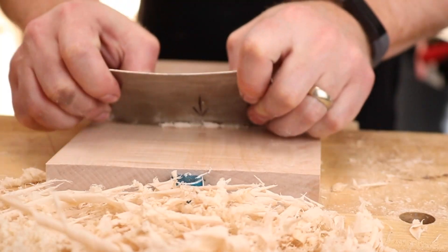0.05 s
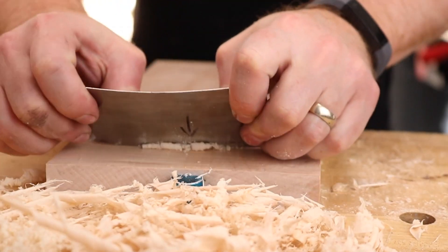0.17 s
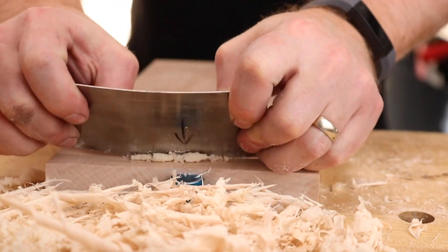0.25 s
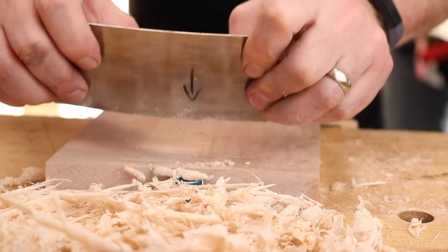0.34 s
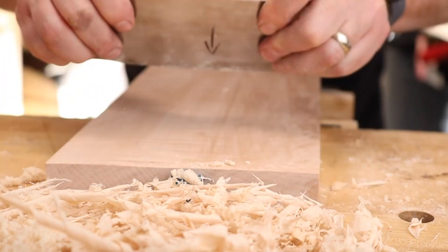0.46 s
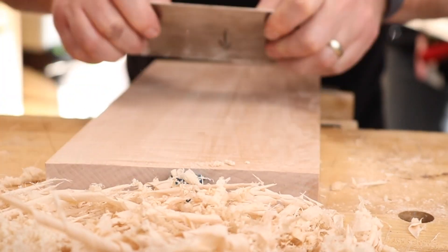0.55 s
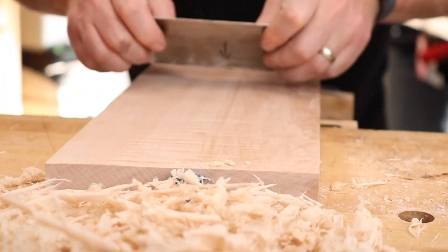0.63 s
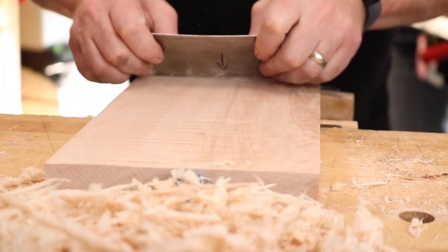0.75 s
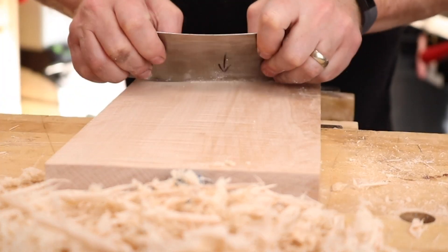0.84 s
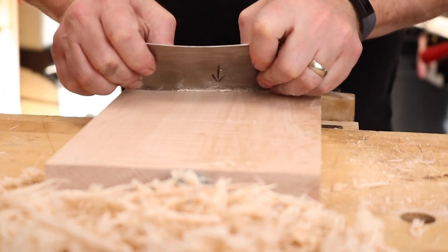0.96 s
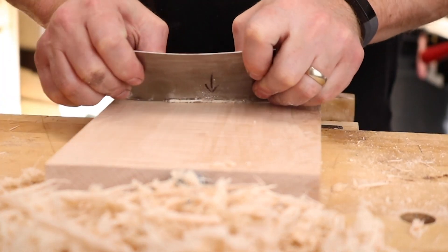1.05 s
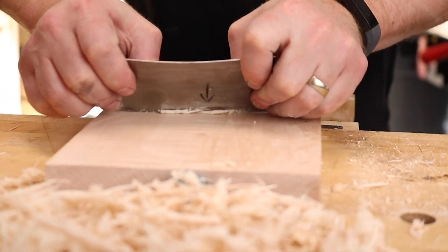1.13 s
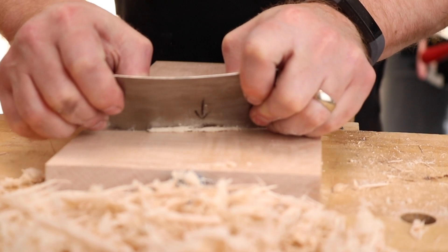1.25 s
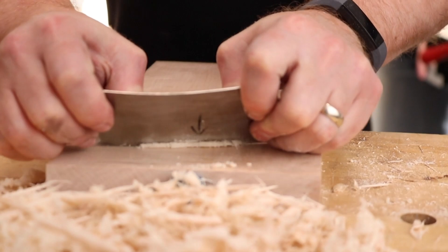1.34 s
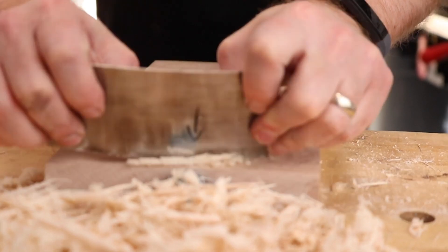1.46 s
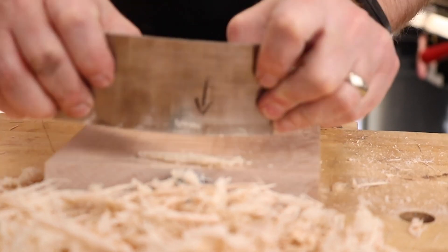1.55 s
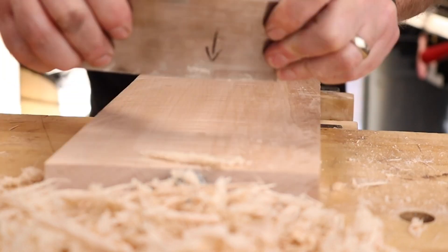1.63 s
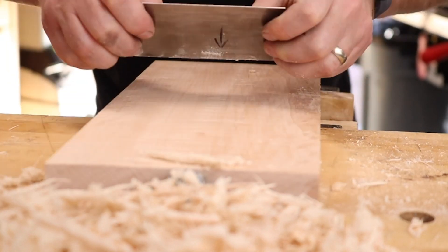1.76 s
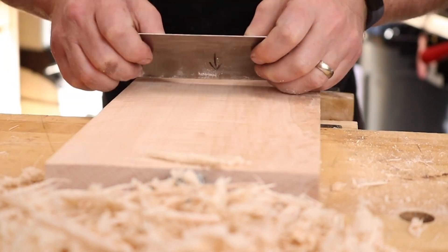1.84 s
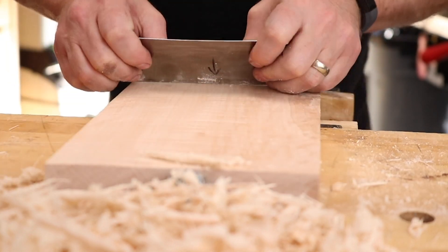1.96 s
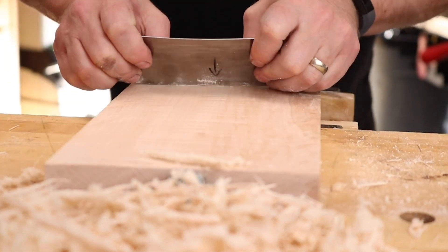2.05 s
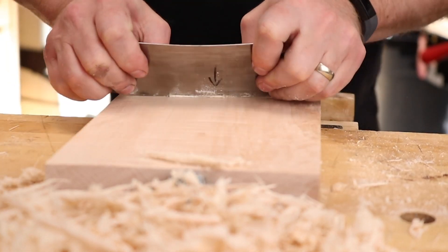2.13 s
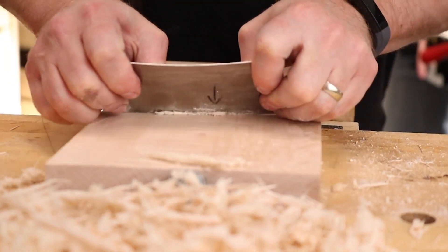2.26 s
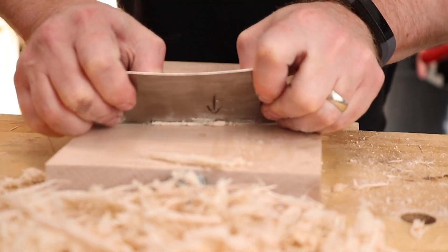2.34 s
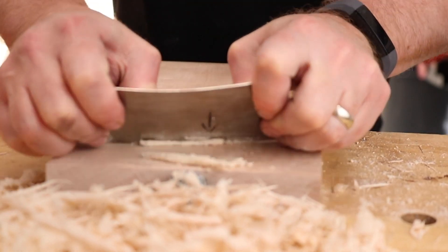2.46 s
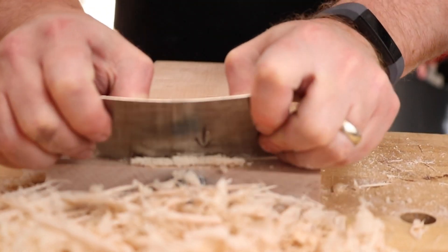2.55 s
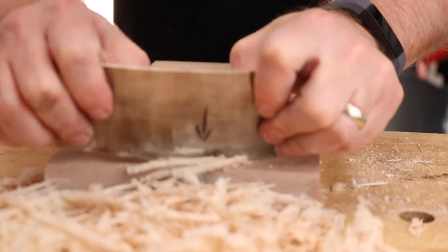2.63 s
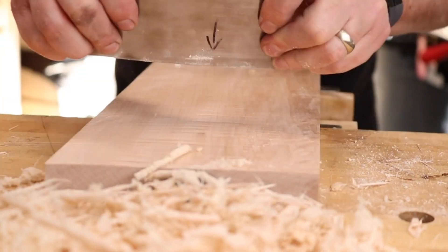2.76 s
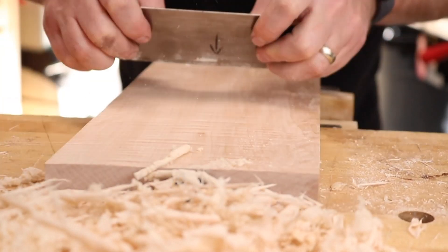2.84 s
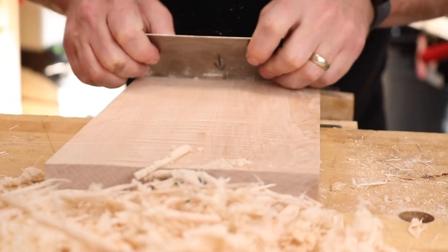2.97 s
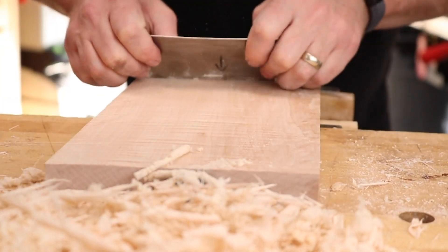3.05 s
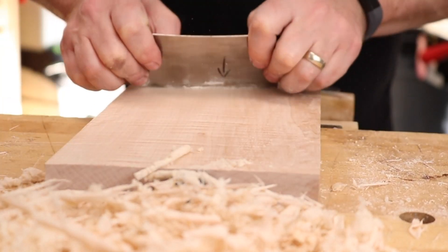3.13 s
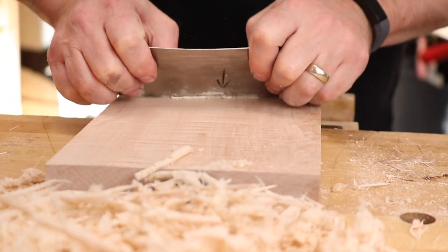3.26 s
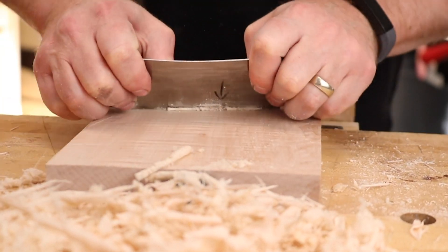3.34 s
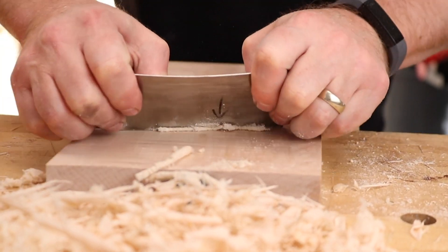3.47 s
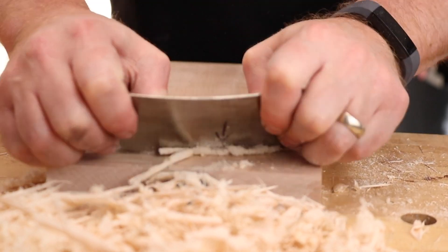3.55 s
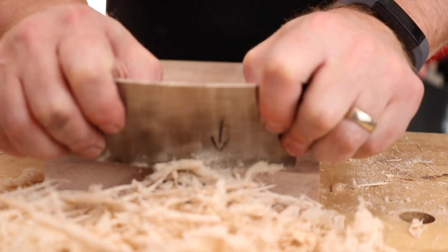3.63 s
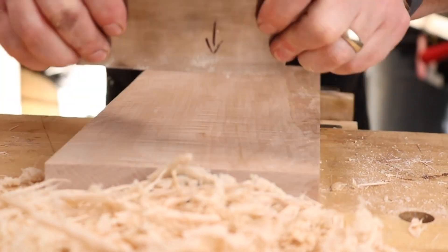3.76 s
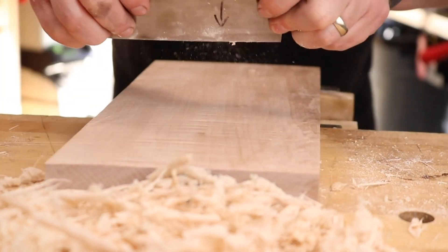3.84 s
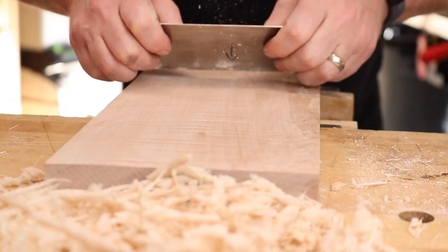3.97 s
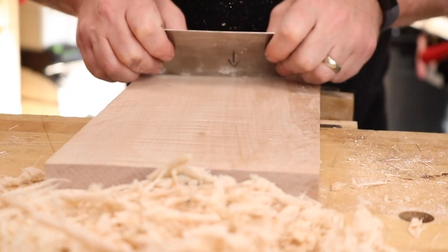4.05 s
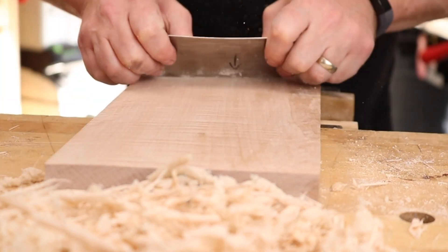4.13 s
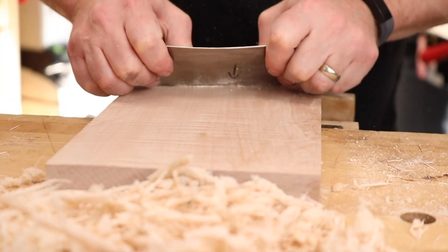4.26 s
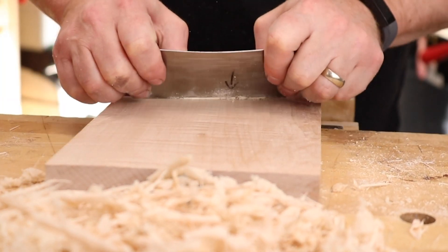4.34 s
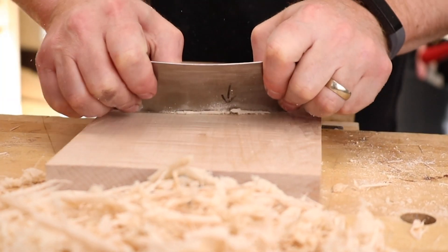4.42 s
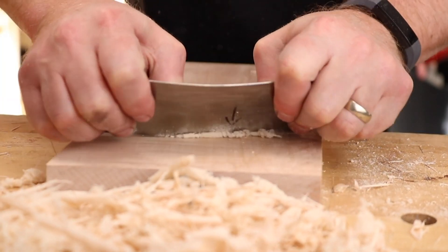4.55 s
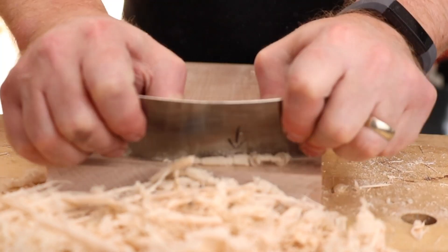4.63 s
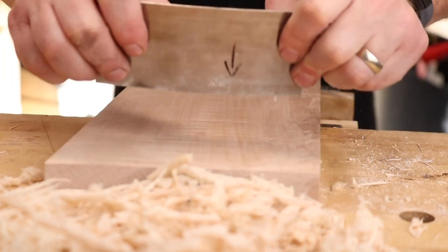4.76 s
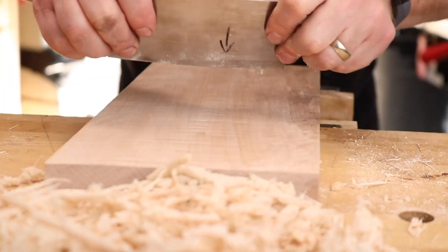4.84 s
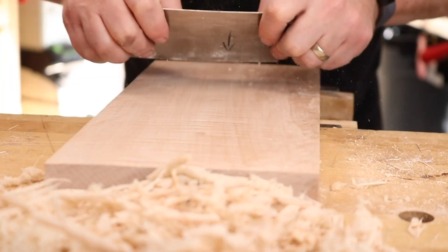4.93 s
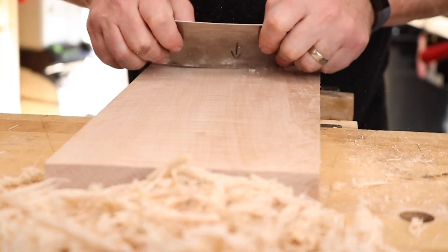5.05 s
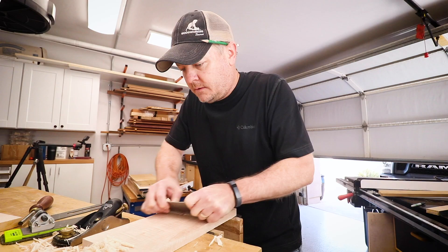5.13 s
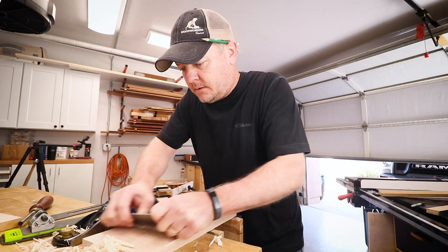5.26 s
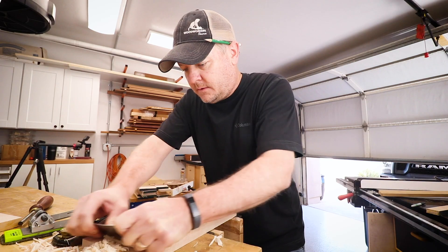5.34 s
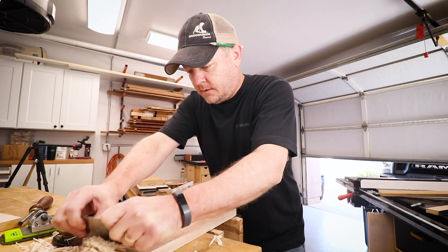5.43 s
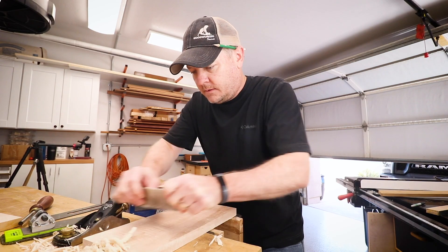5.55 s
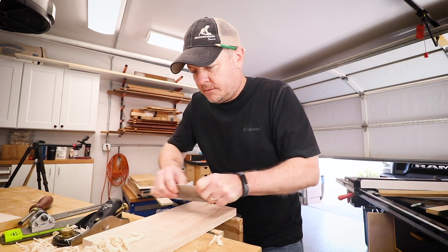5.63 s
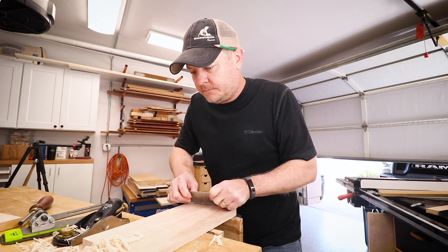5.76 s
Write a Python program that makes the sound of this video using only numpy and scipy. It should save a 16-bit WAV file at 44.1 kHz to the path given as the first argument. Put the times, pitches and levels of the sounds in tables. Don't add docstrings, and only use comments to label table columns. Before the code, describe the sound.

A hard woody clack and a light tick open, followed by a gritty half-second scrape. Five more strokes come at roughly one-second intervals, each started by a board-and-blade tap. The hiss is dense and bright with metallic rasp; bench knocks come after the early strokes. The room replies briefly, over faint hum, creaks and rumble. Close mono microphone.

```python
import sys
import numpy as np
from scipy import signal
from scipy.fft import rfft, irfft, next_fast_len
from scipy.io import wavfile
from scipy.ndimage import uniform_filter1d

SR = 44100
rng = np.random.default_rng(int(sys.argv[2]) if len(sys.argv) > 2 else 0)


def decibels_to_gain(level_db):
    exponent = np.asarray(level_db, float) / 20
    return 10 ** exponent


def generate_wav(sig):
    pcm = np.round(np.clip(np.atleast_2d(sig).T, -1, 1) * 32767).astype(np.int16)
    wavfile.write(sys.argv[1], SR, pcm)


N = 255492

# (frequency [Hz], level [dB], t60 [s])
BOARD_MODES = [(534.3, -6, 0.08), (696, -14.5, 0.047), (793.6, 0, 0.074), (913, 2.5, 0.033),
               (1056, 5, 0.013), (1211.5, 10, 0.0098), (1478, 0.5, 0.017), (1608, -8.5, 0.029),
               (1833, -1, .012), (2026, -10, 0.018), (3140, -17.5, 0.013)]
# (frequency [Hz], level [dB], t60 [s])
STEEL_MODES = [(2568, 5.5, 0.011), (3810, -19.5, 0.019), (4535, -12.5, 0.013), (5880, -14.5, 0.012),
               (7600, -17, 0.0011)]


def evened(x):
    return x / np.sqrt(np.mean(x ** 2) + 1e-20)


def read(points, hz):
    f, value = np.transpose(points)
    return np.interp(np.log(hz + 1), np.log(f + 1), value)


def add(mix, s, sound):
    part = mix[round(s * SR):][:len(sound)]
    part += sound[:len(part)]


def coloured(x, spectrum):
    size = next_fast_len(len(x))
    gain = decibels_to_gain(read(spectrum, np.fft.rfftfreq(size, 1 / SR)))
    return evened(irfft(rfft(x, size) * gain, size)[:len(x)])


def resonate(x, hz, width):
    r = np.exp(-np.pi * width / SR)
    return signal.lfilter([1 - r, 0, r - 1], [1, -2 * r * np.cos(2 * np.pi * hz / SR), r * r], x)


def drift(size, rate_hz):
    lowpass = signal.butter(2, min(rate_hz, 9000), fs=SR)
    return evened(signal.lfilter(*lowpass, rng.standard_normal(size)))


def swells(times, tops_db, rise_db_s, fall_db_s, rest_db):
    grid = np.arange(0, N + 64, 64)
    late = grid[:, None] / SR - times
    slope_db = np.where(late < 0, rise_db_s * late, -fall_db_s * late)
    power = decibels_to_gain(2 * (tops_db + slope_db)).sum(1) + decibels_to_gain(2 * rest_db)
    return np.interp(np.arange(N), grid, np.sqrt(power))


def room_tone():
    # (time [s], rumble level [dB])
    heaves = [(0.0, -39), (0.14, -41.5), (0.841, -38), (1.13, -50), (1.69, -35.5), (1.79, -37.5),
              (2.29, -56.5), (2.42, -52), (2.84, -36.5), (3.63, -47), (3.77, -34), (3.93, -41), (4.09, -45),
              (4.69, -35), (5.48, -52), (5.6, -43)]
    # (time [s], groan level [dB], creak level [dB])
    gives = [(0.3, -68, -74.5), (1.23, -62, -62.5), (1.47, -57.5, -64.5), (1.7, -69, -73),
             (2.76, -52.5, -70), (3.69, -59.5, -82.5), (3.93, -69.5, -64), (4.07, -44, -62),
             (4.34, -69.5, -80), (4.97, -66, -85), (5.21, -53.5, -62), (5.38, -67, -58.5),
             (5.48, -63, -61.5)]
    # (frequency [Hz], density [dB per Hz])
    rumble_colour = [(8.8, -32.5), (15, 14.5), (27, -21.5), (45, 4.5), (56, -14.5), (108, -39), (150, -59),
                     (200, -85.5), (330, -120)]
    # (frequency [Hz], density [dB per Hz])
    groan_colour = [(60, -26), (85, -5.5), (150, -5), (230, -10.5), (280, -5), (400, -26.5)]
    # (frequency [Hz], density [dB per Hz])
    air_colour = [(50, -20), (80, 0), (150, -5), (280, -12), (400, -18), (1000, -23), (2000, -30),
                  (4000, -42), (7000, -70)]
    # (frequency [Hz], waver rate [Hz], level [dB])
    hum_lines = [(161.5, 8, -82), (317.6, 8, -74)]
    give_rise_db_s, give_fall_db_s = 198.5, 173
    s, groan_db, creak_db = np.transpose(gives)

    rumble = coloured(rng.standard_normal(N), rumble_colour)
    rumble = rumble * swells(*np.transpose(heaves), rise_db_s=279, fall_db_s=151.5, rest_db=-68)
    groan = coloured(rng.standard_normal(N), groan_colour)
    groan = groan * swells(s, groan_db - 3, give_rise_db_s, give_fall_db_s, rest_db=-79.5)
    creak = evened(resonate(resonate(rng.standard_normal(N), 385, 150), 385, 150))
    creak = creak * swells(s, creak_db + 2.0, give_rise_db_s, give_fall_db_s, rest_db=-84)
    hum = np.zeros(N)
    for hz, waver_hz, db in hum_lines:
        level = decibels_to_gain(db + 4.0 + 2 * drift(N, waver_hz))
        hum += level * np.sin(2 * np.pi * np.cumsum(hz + drift(N, waver_hz)) / SR)
    air = decibels_to_gain(-76) * coloured(rng.standard_normal(N), air_colour)
    return rumble + groan + creak + hum + air


def ring(modes, tilt_db=0., damping=0.74, rise=0.00064):
    hz, db, t60 = np.array(modes).T[:, :, None]
    t = np.arange(SR // 3) / SR
    level_db = db + tilt_db * np.log2(hz / 1000) - 60 * damping * t / t60
    sound = (decibels_to_gain(level_db) * np.sin(2 * np.pi * hz * t)).sum(0)
    sound *= 1 - np.exp(-t / rise)
    return sound / abs(sound).max()


def rattled(sound):
    rattle, rattle_hz, onset_s = 0.47, 180, 0.0052
    onset = np.minimum(np.arange(len(sound)) / SR / onset_s, 1) ** 2
    return sound * (1 + rattle * drift(len(sound), rattle_hz) * onset)


def landing(blow_db, hard_db, tick_db, damping, thump_db, low_db):
    # (frequency [Hz], level [dB], t60 [s])
    thump_modes = [(91, -12, 0.15), (153, -11.5, 0.18), (236.2, 0, 0.045), (332, -2, .06), (467, 2, 0.11),
                   (564, 1.5, 0.11)]
    lowest = np.add(BOARD_MODES[0], (0, low_db, 0))
    sound = rattled(ring([lowest] + BOARD_MODES[1:], hard_db, damping))
    sound = sound + decibels_to_gain(-13.5 + 0.68 * hard_db) * ring(STEEL_MODES)
    t = np.arange(400) / SR
    tick = resonate(rng.standard_normal(400), 4400, 4300) * np.exp(-t / 0.0015)
    sound[:400] += decibels_to_gain(tick_db + 8.0) * tick
    sound = signal.sosfilt(signal.butter(5, 560, "high", fs=SR, output="sos"), sound)
    return decibels_to_gain(blow_db) * (sound + decibels_to_gain(thump_db) * ring(thump_modes, rise=0.0069))


def patchy(x, depth_db):
    z = signal.stft(x, nperseg=256)[2]
    patches = uniform_filter1d(uniform_filter1d(rng.standard_normal(z.shape), 4, 0), 12, 1)
    return evened(signal.istft(z * decibels_to_gain(depth_db * evened(patches)), nperseg=256)[1][:len(x)])


def stroke(rows, bite_db, bite_loss_db, rub_db, chatter):
    # (frequency [Hz], density [dB per Hz])
    edge_colour = [(1470, -37.5), (2500, -17), (3650, -11.5), (4040, -2.5), (5660, 2), (7630, -0.5),
                   (9660, 0.5), (14900, -3.5), (16000, -11.5), (16400, -59)]
    # (frequency [Hz], width [Hz], level [dB])
    sheen_modes = [(9170, 1800, -13), (11400, 290, -22.5), (13800, 300, -13)]
    # (frequency [Hz], width [Hz], level [dB])
    blade_modes = [(4950, 170, 10), (5540, 410, 6), (6360, 390, -0.5)]
    # (frequency [Hz], density [dB per Hz])
    grain_colour = [(180, -63), (300, -34.5), (344, -40), (494, -4), (686, 1.5), (964, -3.5), (2550, 4),
                    (3630, 2), (4500, 7.5), (5850, -35), (9900, -120)]
    s, level_db = np.transpose(rows)
    t = np.arange(s[0], s[-1], 1 / SR)
    size, sway_db = len(t), 3
    cut_db = np.interp(t, s, level_db)
    along = (t - s[0]) / (s[-1] - s[0])
    bite_db = bite_db + bite_loss_db * along
    board_db = np.minimum(rub_db + 25 - 0.83 * (cut_db + 26), 1 + 10.5 * along)

    slips = np.cumsum(95 * decibels_to_gain(2.0 * drift(size, 18))) / SR
    hold = np.clip(chatter * (1 - 0.5 * along), 0, 1)
    stick_db = 9 * hold * (np.cos(2 * np.pi * slips) + 2.4 * drift(size, 160))
    fibres = rng.standard_normal((3, size)) * decibels_to_gain(2.4 * np.minimum(rng.exponential(1, (3, size)), 5))

    edge = coloured(fibres[0], edge_colour) * decibels_to_gain(0.09 * stick_db + 1.0 * drift(size, 60))
    sheen = sum(decibels_to_gain(db + 5.5 + 1.5 * drift(size, 4.1)) * resonate(edge, hz, width)
                for hz, width, db in sheen_modes)
    edge = edge + sheen
    bent = fibres[1] * decibels_to_gain(stick_db)
    blade = evened(sum(decibels_to_gain(db + sway_db * drift(size, 6.9)) * resonate(bent, hz, width)
                       for hz, width, db in blade_modes))
    rub = coloured(fibres[2] * decibels_to_gain(0.36 * stick_db), grain_colour)
    body = sum(decibels_to_gain(0.036 * db + 10 + sway_db * drift(size, 3.6)) * resonate(rub, hz, 3 / t60)
               for hz, db, t60 in BOARD_MODES + STEEL_MODES[:1])
    rub = rub + body

    sound = patchy(edge, sway_db * 2 / 3)
    sound = sound + decibels_to_gain(2.5 * (bite_db + 5.0) - 11.5) * blade
    sound = sound + decibels_to_gain(board_db) * patchy(rub, sway_db / 2)
    return s[0], decibels_to_gain(cut_db - 4.0) * sound * signal.windows.tukey(size, 400 / size)


def crack(sound, seconds):
    return sound * np.exp(-np.arange(len(sound)) / SR / seconds)


def shop(x, damping=1.):
    # (frequency [Hz], t60 [s])
    decay = [(60, 0.079), (250, 0.68), (800, 0.58), (2500, 0.43), (6000, 0.46), (15000, 0.22)]
    taps = np.zeros(SR)
    at = np.arange(300, SR - 20, 20)
    taps[at + rng.integers(0, 20, len(at))] = rng.choice([-1., 1.], len(at))
    hz, t, z = signal.stft(taps, SR, nperseg=256)
    fade = decibels_to_gain(-60 * damping * t / read(decay, hz)[:, None])
    tail = signal.istft(z * fade, SR, nperseg=256)[1]
    tail[:280] = 0
    return signal.fftconvolve(x, tail / np.linalg.norm(tail))[:N]


def gated(x, floor_db=-79., ratio=.75):
    z = signal.stft(x, nperseg=256, noverlap=192)[2]
    power = uniform_filter1d(uniform_filter1d(abs(z) ** 2, 8, 0), 6, 1)
    level_db = 10 * np.log10(power.clip(1e-20))
    gain = decibels_to_gain(ratio * np.minimum(level_db - floor_db, 0))
    return signal.istft(z * gain, nperseg=256, noverlap=192)[1][:N]


def snag(s, db, hz):
    t = np.arange(600) / SR
    burst = resonate(rng.standard_normal(600) * t * np.exp(-t / .0013), hz, hz / 5)
    return s - .001, decibels_to_gain(db - 5.5) * burst / abs(burst).max()


def snags(start, end, db, hz):
    gap_s, jitter_s, spread_db, spread = .0105, .001, 2, .07
    count = round((end - start) / gap_s) + 1
    chance = rng.standard_normal((8, 3))[:count] * (count > 1)
    times = np.linspace(start, end, count) + jitter_s * chance[:, 0] * (np.arange(count) > 0)
    return [snag(s, db + spread_db * a, hz * np.exp(spread * b)) for s, (_, a, b) in zip(times, chance)]


def knock(db, rise, modes):
    return decibels_to_gain(db) * rattled(ring(modes, rise=rise))


def scene():
    landing_s = [.1379, .2727, 1.0774, 2.0527, 3.0537, 4.0217, 4.9024]
    # (blow [dB], hardness [dB per octave], tick [dB], damping [factor], bench thump [dB])
    landings = [(4.5, 5, -26, 0.92, -25.5), (-14.5, 9, -4, 2.5, -49), (-1.5, 8.5, -23.5, 1.2, -23.5),
                (-12, -16, -37.5, 1.04, -42), (-6, 3, -21, 1.6, -58), (6, 9.5, -22.5, 1.2, -37),
                (-8.5, 6.5, -33, 1.64, -21.5)]
    low_mode_db = [-0.5, -0.5, 0.5, -13.5, -4, 0.5, 10]
    # (time [s], cut level [dB])
    strokes = [
        [(0.172, -46), (0.194, -40.5), (0.235, -60.5)],
        [(0.242, -62.5), (0.254, -39.5), (0.268, -32), (0.402, -17), (0.486, -24), (0.534, -19.5), (0.658, -26),
         (0.742, -43), (0.77, -81)],
        [(1.12, -66), (1.138, -37), (1.26, -29), (1.322, -18), (1.374, -21.5), (1.502, -21.5), (1.646, -26.5),
         (1.684, -46), (1.74, -69)],
        [(2.15, -56.5), (2.161, -37.5), (2.181, -29.5), (2.257, -25), (2.301, -32), (2.373, -22.5),
         (2.661, -24.5), (2.735, -42.5), (2.752, -59)],
        [(3.122, -71), (3.14, -41), (3.218, -26), (3.266, -27), (3.364, -21), (3.516, -19), (3.626, -25),
         (3.688, -37.5), (3.708, -58)],
        [(4.055, -46.5), (4.085, -33.5), (4.153, -27), (4.213, -28), (4.249, -18.5), (4.327, -23.5),
         (4.485, -20.5), (4.59, -38.5), (4.607, -57)],
        [(5.03, -63), (5.044, -38), (5.068, -29.5), (5.216, -20.5), (5.26, -25.5), (5.366, -20.5), (5.44, -27),
         (5.522, -39), (5.545, -57)],
    ]
    # (blade bite [dB], bite lost along the stroke [dB], board rub [dB], chatter [0-1])
    grips = [(-4.5, -6, -37.5, .25), (-1.5, -6, -29.5, 0.4), (-3.5, 0, -31, .25), (-3.5, -2, -29.5, 0.4),
             (-5.5, -1.5, -30.5, 0.2), (-4.5, -6.5, -31, 0.6), (-1, -10, -31, 0.3)]
    # (start [s], end [s],
    # level [dB], centre [Hz])
    catches = [(0.3537, 0.356, -12.5, 6390), (0.3835, 0.4436, -10, 5690), (1.2535, 1.2546, -16, 1530),
               (1.282, 1.283, -12, 2340), (1.3072, 1.355, -10, 5040), (1.4796, 1.475, -16, 7240),
               (1.6726, 1.6714, -12, 9000), (1.9057, 1.909, -43.5, 2770), (2.2747, 2.276, -9, 1946),
               (2.391, 2.392, -7, 4740), (2.586, 2.5885, -9, 5330), (4.238, 4.2927, -13.5, 5690),
               (5.0994, 5.098, -12.5, 4760), (5.12, 5.116, -16.5, 4680), (5.1416, 5.138, -13.5, 6360),
               (5.1656, 5.176, -14, 5400), (5.1984, 5.212, -16, 5660)]
    knock_s = [.739, 1.6706, 2.6442]
    # (level [dB], echo [dB], rise [s])
    knocks = [
        (-30.5, -10.5, 0.0081),
        (-7, -6, 0.0013),
        (0.5, -5, 0.00084),
    ]
    # (frequency [Hz], level [dB], t60 [s])
    bench_modes = [
        [(481, -27, 0.067), (810, -10.5, 0.011), (1120, -20.5, 0.016)],
        [(61, -18.5, 0.23), (163, -8.5, 0.018), (400, -6, 0.02), (737, -0.5, 0.03), (1086, -7.5, 0.056),
         (1416, 5, 0.015), (2070, 2, 0.0065), (2893, 8, 0.0098), (3290, 2.5, 0.011), (4144, 8, 0.0054),
         (4730, -3, 0.0079), (5800, -6, 0.0043), (8700, -7, 0.0039), (11900, -3, 0.0026)],
        [(111.3, -48, 0.074), (182, -32.5, 0.028), (240, -11.5, 0.0506), (352.6, -18, 0.046),
         (505, -9.5, 0.043), (615, -12.5, 0.048), (804, 0, 0.03), (878, 1, 0.028), (1035, 6, 0.021),
         (1218, -7, 0.028), (1431, -10, 0.031), (1606, -6.5, 0.01)],
    ]

    scrape, close, landed, far = np.zeros((4, N))
    for s, row, low_db in zip(landing_s, landings, low_mode_db):
        sound = landing(*row, low_db)
        add(close, s, sound)
        add(landed, s, crack(sound, 0.0094))
    for rows, grip in zip(strokes, grips):
        add(scrape, *stroke(rows, *grip))
    for row in catches:
        for s, sound in snags(*row):
            add(scrape, s, sound)
    for s, (db, echo_db, rise), modes in zip(knock_s, knocks, bench_modes):
        sound = knock(db, rise, modes)
        add(close, s, sound)
        add(far, s, decibels_to_gain(echo_db + 3.5) * crack(sound, 0.0045))

    dull = signal.lfilter(*signal.butter(1, 4000, fs=SR), landed)
    rooms = shop(decibels_to_gain(-11.0) * scrape, 1.45) + shop(decibels_to_gain(-7.0) * dull, 0.99) + shop(far)
    return np.array([close + gated(scrape + rooms) + room_tone()] * 2)


def top_cut(x):
    return signal.sosfilt(signal.butter(12, 16510, fs=SR, output="sos"), x)


def record(dry):
    steep = signal.firwin(511, 16420, window=("kaiser", 8), fs=SR)
    mix = signal.oaconvolve(np.clip(dry, -1, 1), steep[None], "same")
    return top_cut(mix)


dry = scene()
out = record(dry)
generate_wav(out)
```